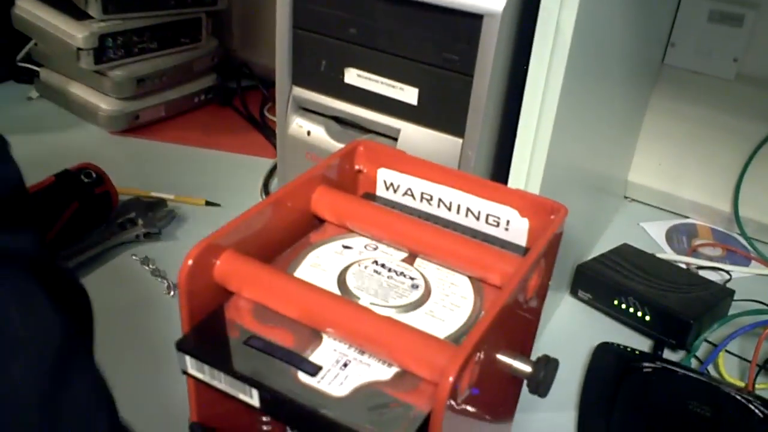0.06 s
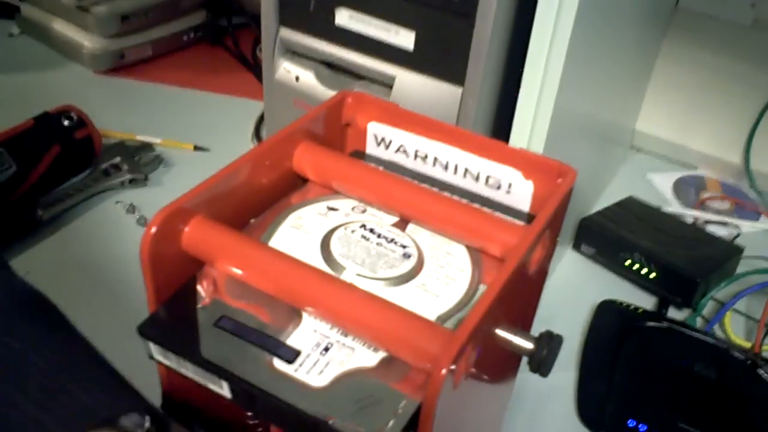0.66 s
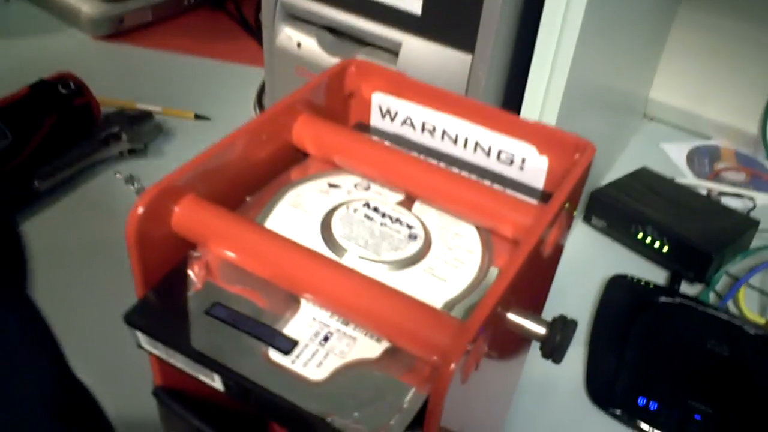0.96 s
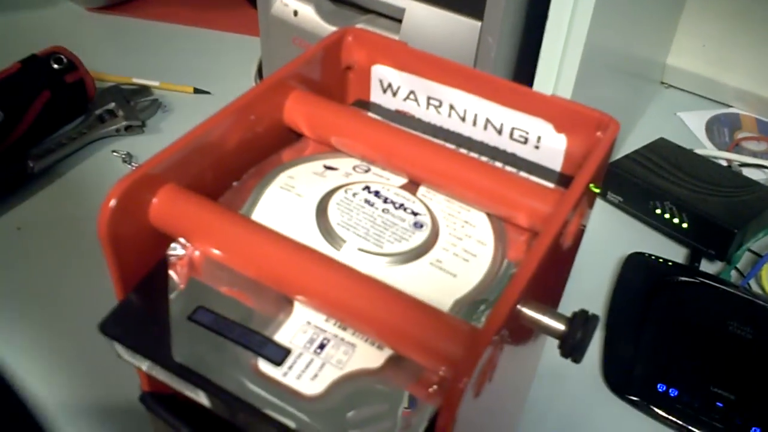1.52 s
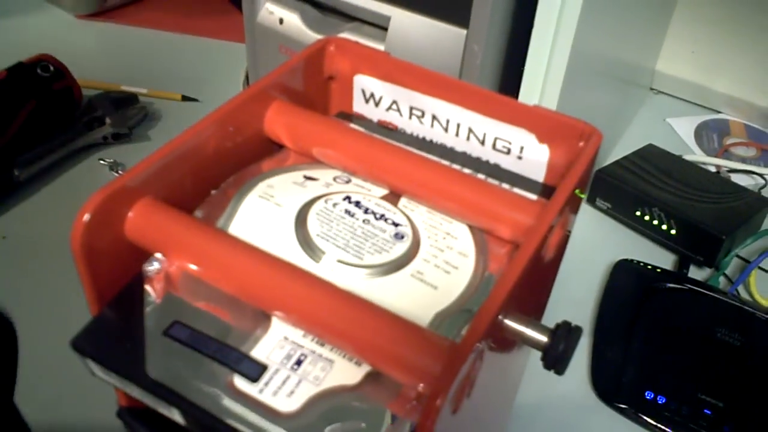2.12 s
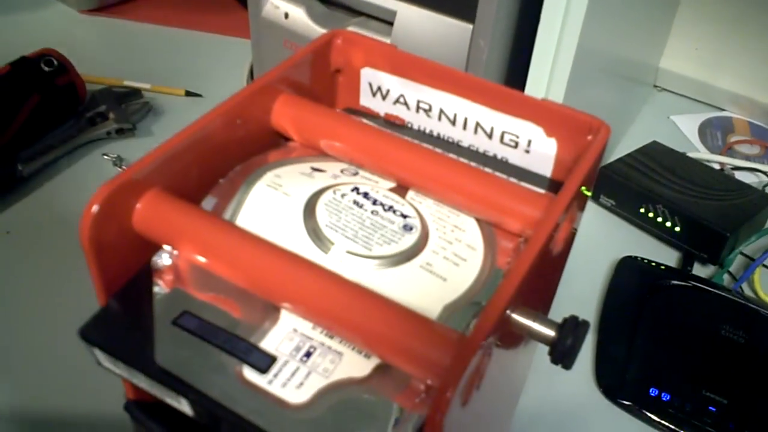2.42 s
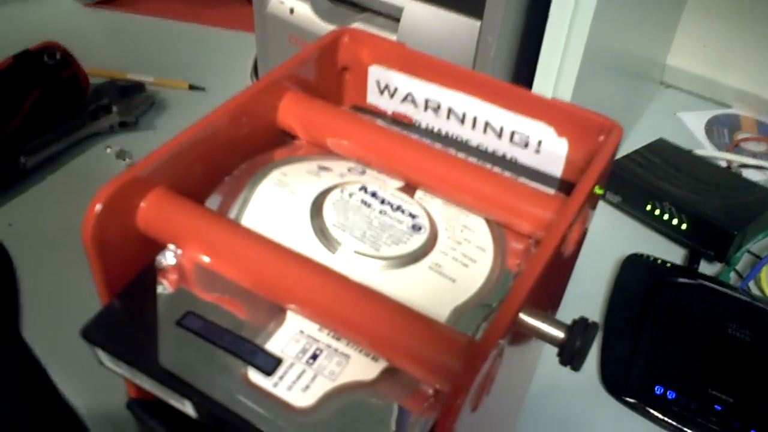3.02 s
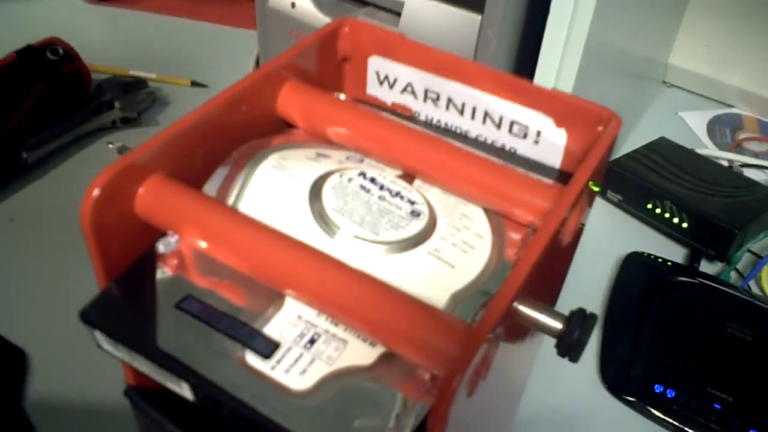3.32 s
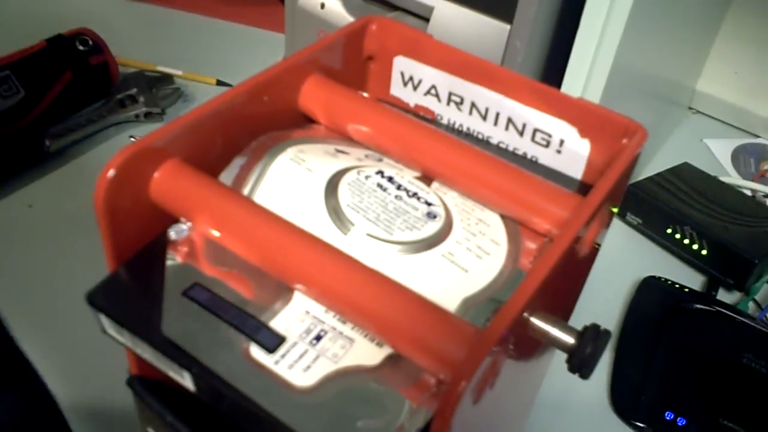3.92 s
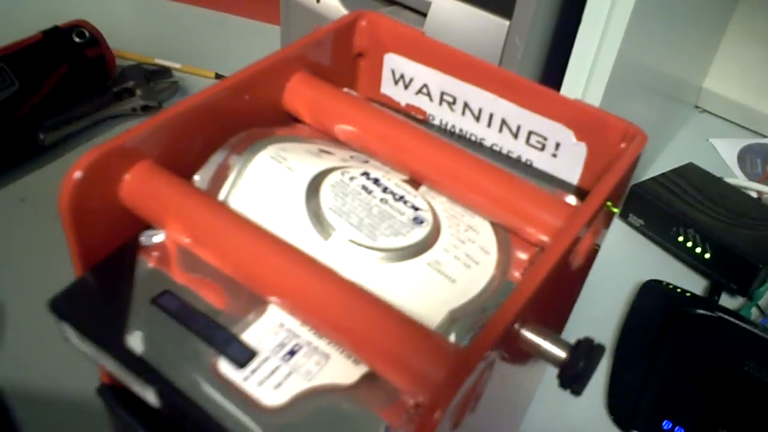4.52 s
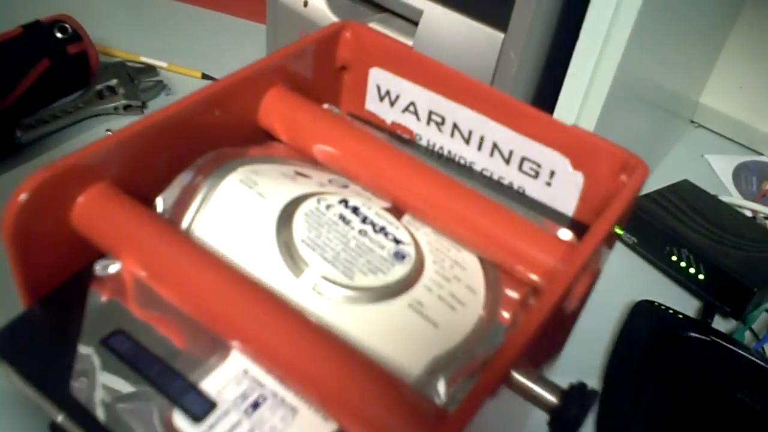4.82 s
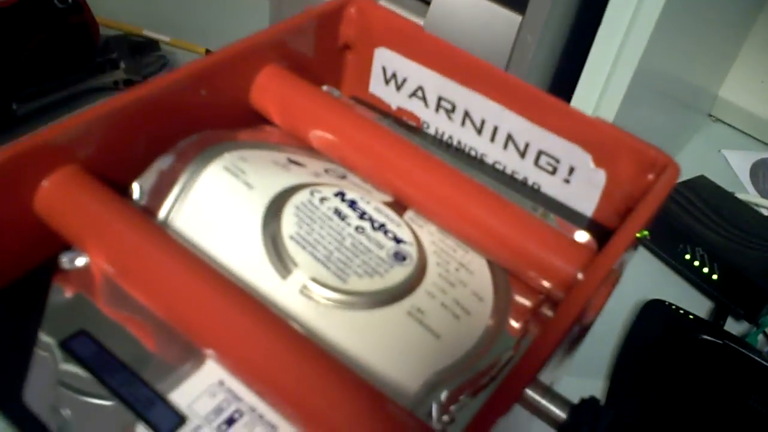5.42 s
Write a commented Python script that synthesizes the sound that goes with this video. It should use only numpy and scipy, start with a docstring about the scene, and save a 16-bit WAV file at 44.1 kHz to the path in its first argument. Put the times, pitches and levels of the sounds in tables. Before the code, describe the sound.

Close up in a small room with a faint fan hum, a hard drive's casing gives way in a steel hydraulic press. Brittle ticks and dull knocks come in uneven clusters, while the hand pump squeaks faintly and clacks about every second. A little before halfway, a big crack thumps the desk and rings briefly, after which the metal keeps ticking and knocking more lightly.

```python
"""A steel knock and a spatter of sharp ticks: a hand-pumped hydraulic jack is bending a hard drive
inside a steel frame on a desk, close by. The casing gives way in brittle fractures and in slips that
knock the whole frame; one big crack leaves it ringing. About once a second the pump squeaks thinly
and clacks. A small room and its steady hum lie behind."""
import sys
import numpy as np
from scipy import signal
from scipy.fft import irfft
from scipy.io import wavfile

SR = 44100
rng = np.random.default_rng(int(sys.argv[2]) if len(sys.argv) > 2 else 0)


def bounce(signal):
    """Save signal as a 16-bit WAV file at the path given by the first command-line argument."""
    frames = np.transpose(np.atleast_2d(signal))
    limited = np.clip(frames, -1, 1)
    pcm = np.round(limited * 32767).astype(np.int16)
    wavfile.write(sys.argv[1], SR, pcm)


N = 245324
HZ = np.fft.rfftfreq(N, 1 / SR)
AGE = np.arange(SR // 4) / SR  # seconds since a blow


def amp(db):
    """Decibels to gain."""
    return 10 ** (np.asarray(db) / 20)


def fade(t, t60):
    """A decay that loses 60 dB in t60 seconds."""
    return np.exp(-np.log(1000) * t / t60)


def attack(rise_s):
    """A blow's onset, easing up from silence."""
    return 1 - np.exp(-AGE / rise_s)


def unit(x):
    """Scales to an rms of one."""
    return x / np.sqrt(np.mean(x ** 2) + 1e-30)


def curve(points, hz):
    """Joins (Hz, value) points by straight lines on a log-frequency axis."""
    f, value = np.transpose(points)
    return np.interp(np.log(hz + 1), np.log(f), value)


def add(mix, s, sound):
    """Drops a sound into the mix at s seconds."""
    part = mix[max(round(s * SR), 0):][:len(sound)]
    part += sound[:len(part)]


def noise(gain):
    """Steady noise, shaped by a gain at each frequency."""
    return unit(irfft(gain * np.exp(2j * np.pi * rng.random(len(HZ))), N))


# The casing's slips. Each row: start in seconds, length in seconds, clank level in dB,
# brightness (crack over clank) in dB, thud pitch in Hz, clank pitch in Hz.
SLIPS = [(0.0705, 0.01, -24, -6.5, 444.5, 902.5), (.103, .001, -40.5, -14, 443, 810),
         (0.2077, 0.0027, -28.5, 2.5, 428, 830), (0.2483, 0.0027, -31.5, -5.5, 435.4, 872),
         (.503, 0.0081, -47, -10, 449, 864), (0.6556, .007, -43.5, -15, 447, 852),
         (0.711, 0.014, -37.5, -4.5, 456, 1210), (0.7522, 0.0018, -48, 4.5, 442, 925),
         (0.7677, 0.026, -42, -9, 438, 940), (1.112, .001, -46.5, -4.5, 388, 1313),
         (1.199, .003, -32.5, -3, 393, 1500), (1.311, 0.0017, -48, -14.5, 393, 860),
         (1.6356, .013, -40.5, -10.5, 395, 863), (1.7508, 0.012, -32, -7, 495, 854),
         (1.7771, 0.0048, -33, -10.5, 393.7, 1490), (2.1486, 0.011, -17, 2, 384, 845),
         (2.19, 0.00077, -15.5, -11, 382.6, 1079), (2.2113, 0.0063, -29, -2, 393.4, 1456),
         (2.61, 0.014, -53, 2.5, 404, 902), (2.6602, 0.0047, -42.5, -13, 397, 920),
         (2.7357, 0.034, -48.5, -6, 390.6, 1470), (2.803, 0.0118, -36.5, -6, 393, 884),
         (3.2518, 0.0063, -33, -6, 399.6, 874), (3.526, .002, -51.5, 1, 536, 860),
         (3.705, 0.0075, -54, -11.5, 390, 1050), (3.755, 0.052, -50.5, -9.5, 511.5, 1470),
         (3.846, 0.012, -39, -1.5, 544, 1470), (4.5325, 0.021, -57.5, -13, 622, 796),
         (4.6783, 0.0047, -41.5, -2.5, 524, 1460), (4.9264, 0.0021, -45.5, -10.5, 430, 932),
         (5.07, 0.0093, -39.5, -10.5, 498, 1508), (5.3437, 0.0046, -55, -12, 565, 837)]
# A knock's broad EQ. Each row: frequency in Hz, gain in dB.
KNOCK_EQ = [(25, -30), (60, -11.5), (120, -17.5), (200, -7.5), (300, -2), (450, 0), (750, -0.5), (1300, 3),
            (1750, -2), (4600, -3), (6300, -10.5), (8500, -11), (12500, -21), (16000, -27.5)]
# Envelopes of thud, clank, crack and fizz. Each row: rise in seconds, t60 in seconds,
# height of the first snap relative to the ringing part.
KNOCK_ENVELOPES = [(0.0021, 0.15, .3), (0.0015, 0.089, 0.6), (0.00024, 0.062, 1.7), (.0002, 0.055, 2.4)]
# Energy of the jolt that stops a slip, in the same four bands; an average jerk is 1.
STOP_ENERGY = [5, 2.2, .5, .4]
CRACK_HZ = 2445

def knocks(snap_s=.0008, thud_share=.54, clank_share=.23, crack_share=.08, jerk_count=4):
    """Slips and pump strokes knock the frame: bass lingers, treble snaps at each jerk and dies first."""
    bands, out = vibration(KNOCK_EQ, resonance=.72), np.zeros(N)
    blows = [(*row, CRACK_HZ) for row in SLIPS] + pump_blows()
    for s, length, clank_db, brightness, thud_hz, clank_hz, crack_hz in blows:
        jerk_times = (np.arange(jerk_count) + rng.random(jerk_count)) / jerk_count
        jerk_energy = rng.exponential(1, jerk_count)
        modes = [(thud_hz, thud_share), (clank_hz, clank_share), (crack_hz, crack_share), (0, 0)]
        levels = knock_levels(clank_db, brightness)
        for band, db, mode, stop, shape in zip(bands, levels, modes, STOP_ENERGY, KNOCK_ENVELOPES):
            rise, t60, snap = shape
            response = (fade(AGE, t60) + snap * np.exp(-AGE / snap_s)) * attack(rise)
            jolts = slip(length, jerk_times, jerk_energy, stop)
            power = abs(signal.fftconvolve(jolts, response ** 2)[:len(AGE)])  # jolts add in energy
            add(out, s, burst(band, np.sqrt(power), db, *mode))
    return out


def slip(length, jerk_times, jerk_energy, stop_energy, release_energy=1.6):
    """Metal lets go with a snap, slides in uneven jerks and stops with a jolt: energy per sample."""
    seconds = np.r_[0, jerk_times, 1] * np.clip(length, 0, .05)
    energy = np.r_[release_energy, jerk_energy, stop_energy]
    return np.bincount((seconds * SR).astype(int), energy, len(AGE))


def knock_levels(clank, brightness, thud_limit_db=-28.5, usual_clank_db=-40):
    """Band levels in dB: dull slips thud more, up to what the frame can give; hard ones fizz more."""
    push = clank + .2 - .25 * brightness
    thud = push - 10 * np.log10(1 + amp(push - thud_limit_db) ** 2)
    crack = clank + brightness
    fizz = crack - 12 + .24 * (clank - usual_clank_db) + .21 * brightness
    return thud, clank, crack, fizz


# Resonances of frame and drive. Each row: pitch in Hz, width in Hz, peak weight in dB.
FRAME_MODES = [(173, 30, 8.5), (404, 20, 15.5), (459, 62, 10.5), (541.7, 50, 9.5), (641.4, 24, 10),
               (861, 43, 12.5), (905, 56, 13.5), (1207, 45, 7.5), (1478, 50, 12.5), (1980, 140, 5),
               (2474, 21, 13.5), (2958, 43, 4.5), (3820, 17, 8), (4225, 78, 7), (4130, 40, 6),
               (4540, 77, 3.5), (5090, 50, 6), (5380, 85, 0)]
# Edges of the thud, clank, crack and fizz bands in Hz.
BAND_EDGES_HZ = [15, 700, 2000, 6000, 18000]

def vibration(eq, resonance):
    """The metal's crowded modes as four noise bands; resonance brings out the frame's own peaks."""
    peaks = sum(amp(db) ** 2 / (1 + (2 * (HZ - hz) / width) ** 2) for hz, width, db in FRAME_MODES)
    gain = amp(curve(eq, HZ)) * np.sqrt(1 + resonance * peaks)
    return [noise(gain * (HZ >= lo) * (HZ < hi)) for lo, hi in zip(BAND_EDGES_HZ, BAND_EDGES_HZ[1:])]


def burst(band, envelope, db, hz=0, share=0):
    """A blow sets one band vibrating; a share of the energy sings in a single mode at hz."""
    start, share = rng.integers(N - len(AGE)), np.clip(share, 0, 1)
    crowd = unit(band[start:start + len(AGE)] * envelope)
    mode = unit(np.sin(2 * np.pi * (hz * AGE + rng.random())) * envelope)
    sound = unit(np.sqrt(1 - share) * crowd + np.sqrt(share) * mode)
    return amp(db) * sound * np.sqrt(.01 * SR / len(AGE))  # db is the rms if packed into 10 ms


# The casing's brittle ticks. Each row: start in seconds, spike decay in seconds, crack level in dB,
# focus in dB (low for a dry snap, high for a pure ping), pitch in Hz.
FRACTURES = [(0.082, 0.0011, -38, -1.5, 1800), (0.1536, 0.0013, -32.5, 11.5, 3560),
             (0.1793, .0017, -28.5, 6, 3740), (0.194, 0.0045, -44, -0.5, 3670),
             (0.2173, .0011, -32.5, -3, 5270), (0.241, 0.00086, -44, 3, 2450), (.616, .005, -60, 12, 3500),
             (0.773, .004, -51.5, 0.5, 5100), (.9353, 0.0031, -35.5, 6.5, 3560),
             (0.943, 0.00084, -46, 3, 3540), (0.9693, 0.0009, -44, 5, 3840),
             (1.015, 0.0032, -35.5, 6.5, 3700), (1.029, .0015, -48, 3, 3700), (1.0644, .001, -49, 3, 4130),
             (1.087, 0.0011, -47, 7, 4100), (1.1135, .001, -54, 0, 1800), (1.1204, 0.0016, -50.5, 0, 1950),
             (1.1833, 0.00083, -45, 9, 5000), (1.7547, 0.0011, -29.5, 9.5, 2780),
             (2.0075, 0.00054, -50, 4, 2020), (2.0199, 0.00092, -42, -3, 1920),
             (2.04, 0.00049, -49, -2.5, 9900), (2.0963, .0012, -53, 9, 5200), (2.149, .008, -21, 9, 3940),
             (2.178, .0015, -33, 6, 4300), (3.0532, .003, -45, 5.5, 4660), (3.07, 0.0013, -48, 3, 1983),
             (3.1074, 0.0012, -46.5, 2.5, 4280), (3.1712, .0008, -48, 17, 2050),
             (3.2102, 0.00082, -37, 16, 2280), (3.2178, .008, -39, 12, 2104),
             (3.2229, 0.00069, -34.5, 5, 1970), (4.142, .001, -54.5, 0.5, 3915),
             (4.183, .0012, -56.5, 11, 5010), (4.2267, 0.0013, -32, 3, 3900), (4.274, 0.0053, -43, 2, 2160),
             (4.465, 0.0022, -50.5, 4, 2008), (5.451, 0.0012, -39.5, 9, 2003), (5.482, .0009, -45, 2, 4280),
             (5.5284, 0.0016, -44.5, 2, 4330), (5.5554, .0007, -49.5, -3, 10600)]
# A tick's broad EQ. Each row: frequency in Hz, gain in dB.
TICK_EQ = [(30, -8.5), (110, -17.5), (250, -13.5), (400, 3), (750, -8), (1400, 3.5), (2600, -1), (3700, 1),
           (5100, 2), (6300, -3), (7700, 0), (10000, -3), (13000, -11), (16000, -20.5)]

def ticks(rise_s=.00031, shiver_db=-14, shiver_t60=.055, thud_db=-11):
    """A fracture is a sharp spike, then a short shiver of the casing and a slower, faint thud."""
    (low, *bands), out = vibration(TICK_EQ, resonance=.1512), np.zeros(N)
    thud = fade(AGE, t60=.081) * attack(rise_s=.0015)
    shiver = amp(shiver_db) * fade(AGE, shiver_t60)
    for s, spike_s, crack, focus, hz in FRACTURES + crackle():
        clank, fizz = crack - 3 - 1.213 * focus, crack - focus
        pitch_share = .2 + .02 * focus
        envelope = np.hypot(np.exp(-AGE / spike_s), shiver) * attack(rise_s)
        add(out, s, burst(low, thud, clank + thud_db))
        for band, db, lo, hi in zip(bands, (clank, crack, fizz), BAND_EDGES_HZ[1:], BAND_EDGES_HZ[2:]):
            add(out, s, burst(band, envelope, db, hz, pitch_share * (lo <= hz < hi)))
    return out


# Patches of crackle. Each row: start in seconds, end in seconds, ticks per second, level in dB.
CRACKLES = [(0.113, 0.167, 127, -52), (1.135, 1.171, 80, -59.5), (3.001, 3.024, 80, -62),
            (4.361, 4.659, 12, -70)]

def crackle(spike_s=.0018, focus_db=1, hz=4330, spread_db=1.5):
    """The casing crackles with faint ticks, uneven in time, level and pitch: rows like FRACTURES."""
    rows = []
    for start, end, per_s, db in CRACKLES:
        for s in np.arange(start, end, 1 / per_s):
            late, loud, detune = rng.random(), rng.standard_normal(), rng.uniform(-.2, .23)
            rows.append((s + .5 * late / per_s, spike_s, db + spread_db * loud,
                         focus_db, hz * (1 + detune)))
    return rows


# Pump strokes. Each row: clack time in seconds, clack level in dB, rub lead in seconds,
# rub level in dB, squeak lead in seconds, squeak level in dB, thud pitch in Hz.
STROKES = [(.4778, -42.5, 0.025, -47, .025, -55, 444), (1.4449, -44, 0.018, -43, 0.021, -48.5, 502),
           (2.4756, -42.5, .04, -50, 0.028, -52, 486), (3.4898, -39.5, .021, -45.5, .02, -46.5, 545.4),
           (4.735, -39, .036, -43, .0165, -49, 509)]

def pump_blows(rub_s=.015, clack_s=.003, contact_lead_s=.0045, clank_hz=1520, clack_hz=5140):
    """The lever rubs, then clacks home in two hits: rows like SLIPS, plus a crack pitch in Hz."""
    rows = []
    for s, db, rub_lead, rub_db, _, _, thud_hz in STROKES:
        frame = thud_hz, clank_hz
        rows += [(s - rub_lead, rub_s, rub_db, -2, *frame, CRACK_HZ),  # dull rub
                 (s - contact_lead_s, clack_s, db - 10, 8.5, *frame, clack_hz),  # light, bright contact
                 (s, clack_s, db, 6, *frame, clack_hz)]  # the lever seats
    return rows


# High notes a clack leaves on the lever. Each row: pitch in Hz, length in seconds,
# level in dB relative to the clack.
LEVER_PINGS = [(13300, 0.017, -14), (9750, 0.028, -16.5)]

def lever_chirps(squeak_hz=12370, squeak_s=.013, touch_lead_s=.011, touch_s=.026, touch_db=-58.5):
    """The lever squeaks faintly as steel touches, louder as it catches, and pings with the clack."""
    rows = []
    for s, db, _, _, lead, squeak_db, _ in STROKES:
        rows.append((s - lead - touch_lead_s, touch_s, squeak_hz, touch_db))
        rows.append((s - lead, squeak_s, squeak_hz, squeak_db))
        rows += [(s, length, hz, db + ping_db) for hz, length, ping_db in LEVER_PINGS]
    return rows


def squeaks(waver=.006, waver_hz=500, rasp=.41, under_db=-11, under_ratios=(.555, .74, .84)):
    """Dry steel chirps on a high, rasping note, with weaker unrelated modes below it."""
    drift, grip = (noise(1 / (1 + (HZ / waver_hz) ** 2)) for _ in range(2))
    squeal = (2.227, .026, 9600, -45.5)  # steel scrapes on steel just after the big crack
    out = np.zeros(N)
    for s, length, hz, db in [squeal] + lever_chirps():
        progress = np.linspace(0, 1, int(length * SR))
        now = int(s * SR) + np.arange(len(progress))
        turns = np.cumsum(hz * (1 + waver * drift[now])) / SR
        under = sum(np.sin(2 * np.pi * ratio * turns) for ratio in under_ratios)
        tone = (np.sin(2 * np.pi * turns) + amp(under_db) * under) * (1 + rasp * grip[now])
        add(out, s, amp(db) * unit(tone * np.sqrt(progress) * (1 - progress)))
    return out


# The steel's long modes. Each row: pitch in Hz, level in dB relative to the clank, t60 in seconds.
RING_MODES = [(852, -36, 1.3), (626, -43.5, 1.7), (915, -49.5, 0.75), (364, -45.5, .8), (1518, -54.5, .8)]

def ring(feed_samples=SR // 200):
    """Every knock stores a little energy in the steel; only the big crack makes it sing out."""
    t = np.arange(N) / SR
    energy, out = np.zeros(N), np.zeros(N)
    for s, _, clank_db, *_ in SLIPS + pump_blows():
        add(energy, s, np.full(feed_samples, amp(clank_db) ** 2 / feed_samples))
    for hz, db, t60 in RING_MODES:
        stored = signal.lfilter([1], [1, -fade(1 / SR, t60) ** 2], energy)
        out += amp(db) * np.sqrt(2 * stored) * np.sin(2 * np.pi * (hz * t + rng.random()))
    return out


# The desk under the press. Each row: start in seconds, pitch in Hz, level in dB, t60 in seconds.
DESK_THUMPS = [(2.19, 280.4, -33, .16), (4.929, 168, -48, 0.15)]

def desk_thumps(rise_s=.006):
    """Now and then a jolt reaches the desk, which answers with one soft low note."""
    out = np.zeros(N)
    for s, hz, db, t60 in DESK_THUMPS:
        add(out, s, amp(db) * np.sin(2 * np.pi * hz * AGE) * fade(AGE, t60) * attack(rise_s))
    return out


def creep(per_s=45, level_db=-66, band_db=(0, -2, -10.5, -17.5)):
    """Under the knocks the loaded metal settles in many faint, dull slips."""
    slips = (1 + rng.random(N)) * (rng.random(N) < per_s / SR)
    response = fade(AGE, t60=.31) * attack(rise_s=.002)
    power = abs(signal.fftconvolve(slips ** 2, response ** 2)[:N])
    bands = vibration(KNOCK_EQ, resonance=.9)
    body = sum(band * amp(db) for band, db in zip(bands, band_db))
    return amp(level_db) * unit(body * np.sqrt(power))


# The small room's decay. Each row: frequency in Hz, t60 in seconds.
ROOM_DECAY = [(150, 0.88), (500, 0.33), (2000, 0.29), (6000, 0.21), (14000, 0.15)]

def room(x, build_s=.0085):
    """The room answers with a diffuse tail whose treble dies first."""
    hz, t, spectrum = signal.stft(rng.standard_normal(SR * 3 // 4), SR, nperseg=256)
    tail = signal.istft(spectrum * fade(t, curve(ROOM_DECAY, hz)[:, None]), SR)[1]
    tail *= 1 - np.exp(-(np.arange(len(tail)) / SR / build_s) ** 2)
    return signal.fftconvolve(x, tail / np.linalg.norm(tail))[:N]


# The noise bed's EQ. Each row: frequency in Hz, gain in dB.
HUM_EQ = [(15, -47.5), (25, -33.5), (108, -22.5), (161, -6.5), (236, -10.5), (384, -11.5), (451, -3),
          (754, -6), (863, -13.5), (1020, -5.5), (1480, -9.5), (1650, -10), (4250, -20), (14800, -34),
          (16000, -38)]
# Steady tones in the room. Each row: pitch in Hz, rms level in dB.
HUM_TONES = [(296, -79), (388, -77), (533, -78.5), (942, -101.5)]

def hum(bed_db=-64, half_width_hz=4):
    """Fans hum in the room over the microphone's hiss."""
    tones = sum(amp(db) * noise(1 / (1 + ((HZ - hz) / half_width_hz) ** 2)) for hz, db in HUM_TONES)
    return amp(bed_db) * noise(amp(curve(HUM_EQ, HZ))) + tones


def scene(room_db=-20, low_cut_hz=105):
    """The press up close, the room behind it; the knocks, ticks, squeaks and creep carry little deep bass."""
    metal = knocks() + ticks() + squeaks() + creep()
    low_cut = signal.butter(1, low_cut_hz, "highpass", fs=SR, output="sos")
    press = signal.sosfilt(low_cut, metal) + desk_thumps()
    return (press + ring() + amp(room_db) * room(press) + hum())[None]


def record(dry, ceiling=.6, cutoff_hz=16100):
    """The microphone rounds off the highest peaks; a steep low-pass trims the very top."""
    rounded = ceiling * np.tanh(dry / ceiling)
    lowpass = signal.firwin(401, cutoff_hz, window=("kaiser", 9), fs=SR)
    return signal.oaconvolve(rounded, lowpass[None], "same", axes=1)


dry = scene()
out = record(dry)
bounce(out)
```